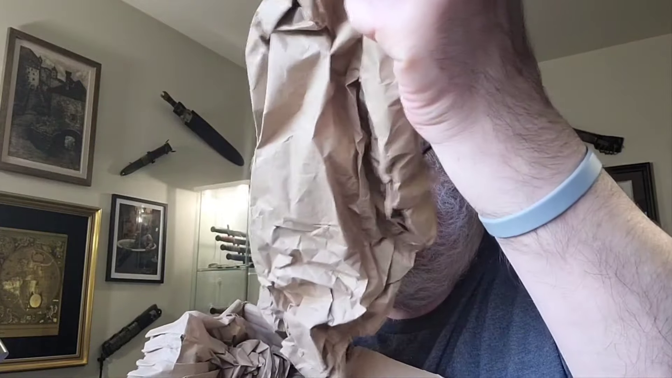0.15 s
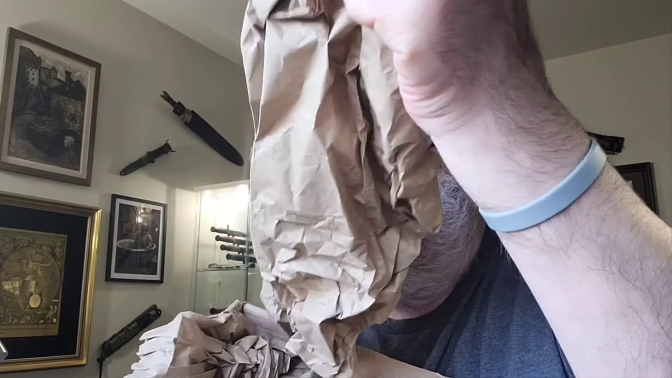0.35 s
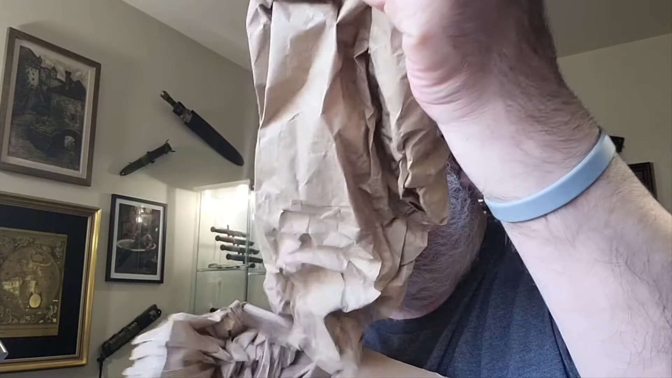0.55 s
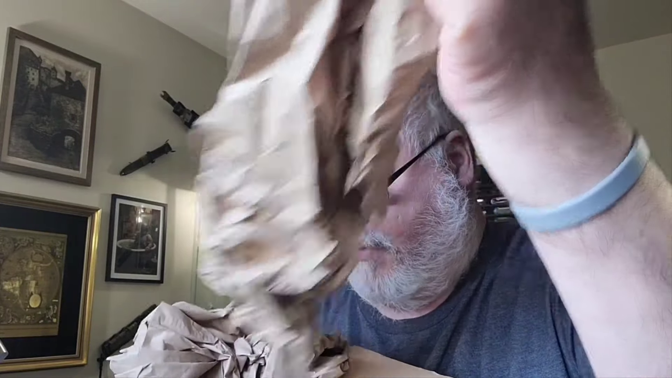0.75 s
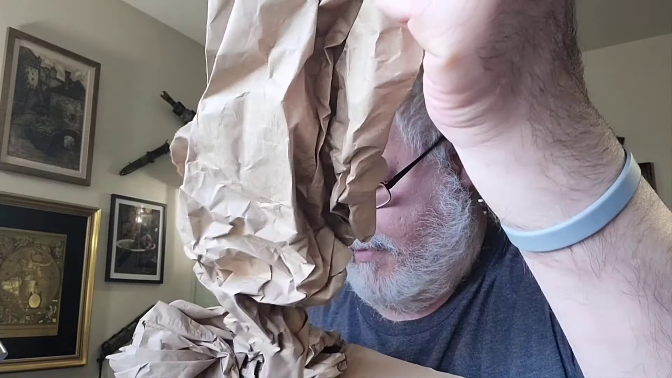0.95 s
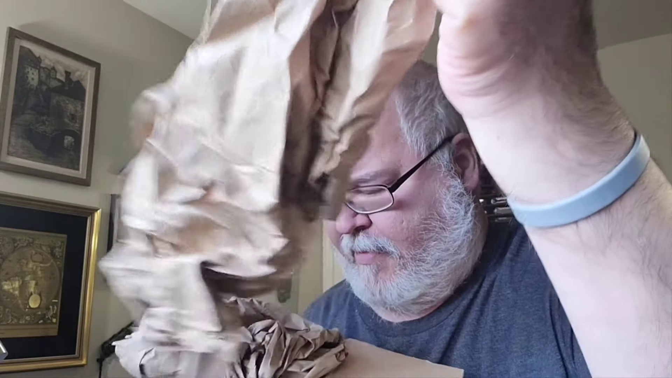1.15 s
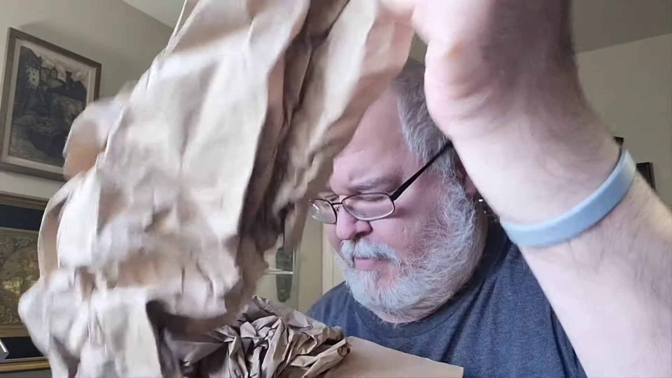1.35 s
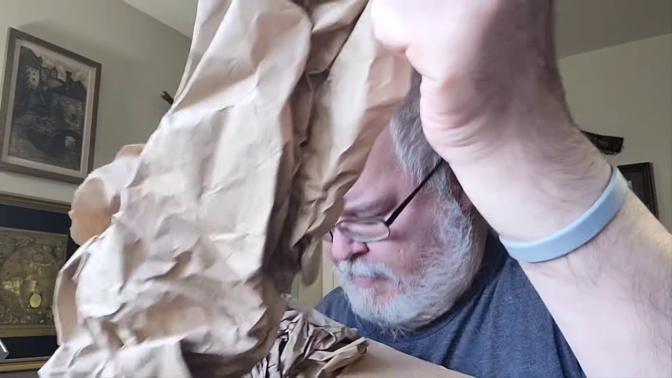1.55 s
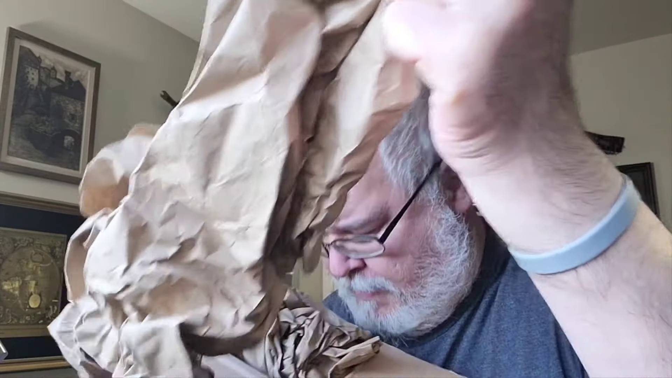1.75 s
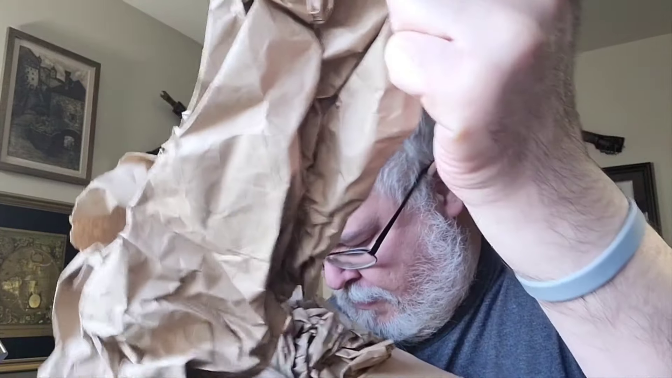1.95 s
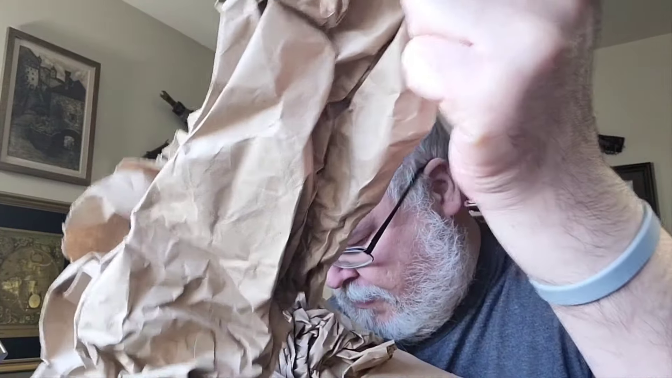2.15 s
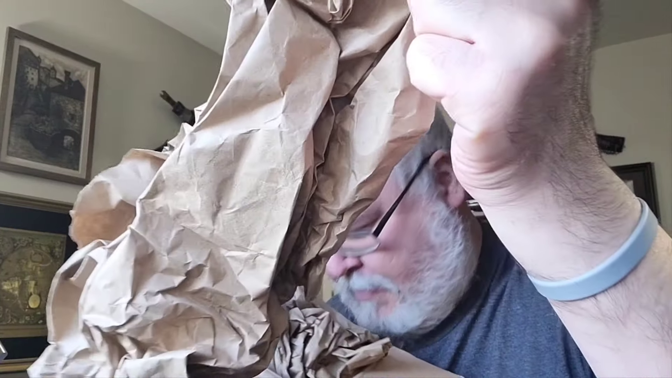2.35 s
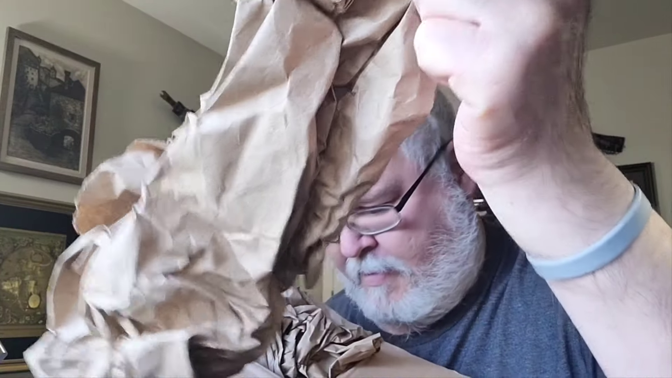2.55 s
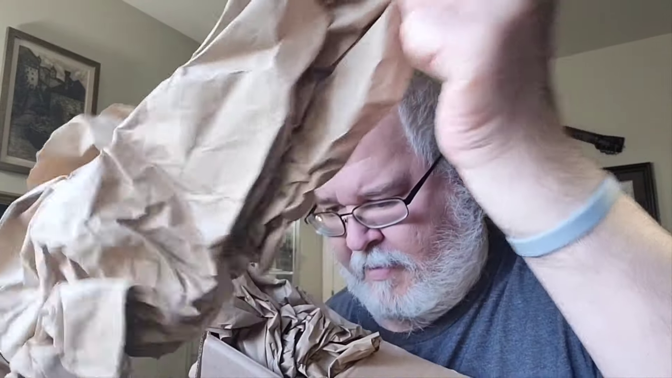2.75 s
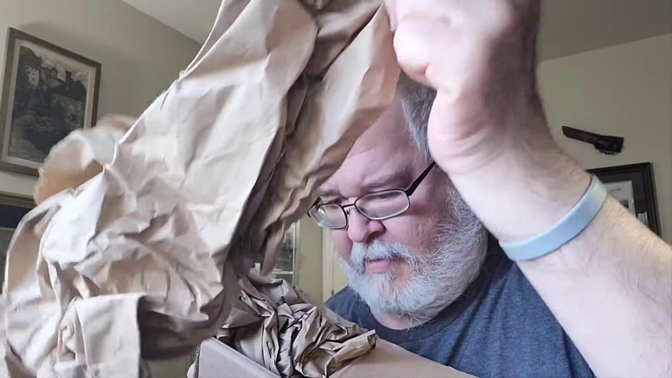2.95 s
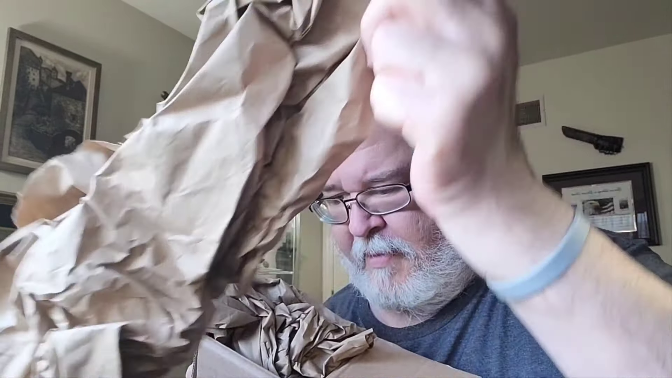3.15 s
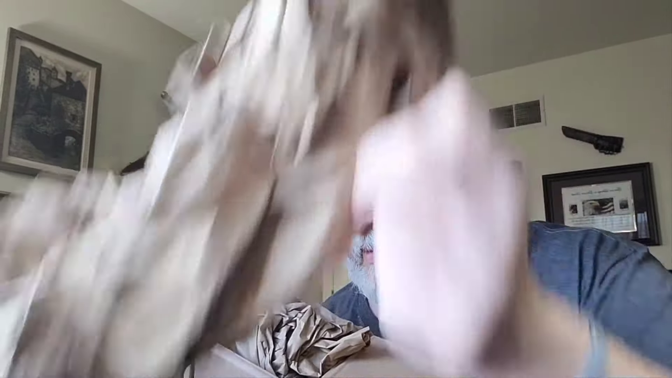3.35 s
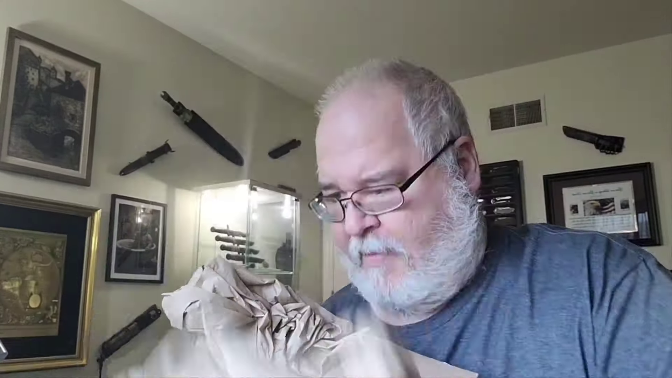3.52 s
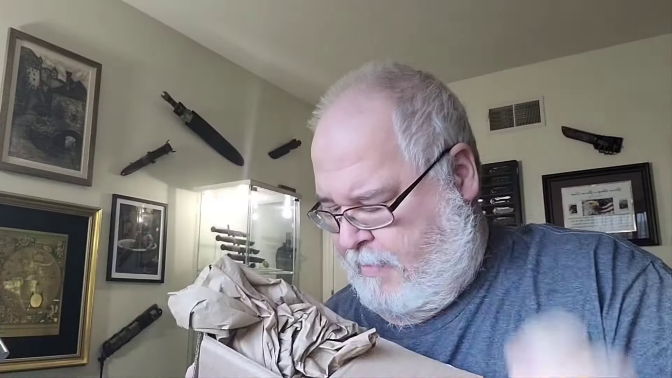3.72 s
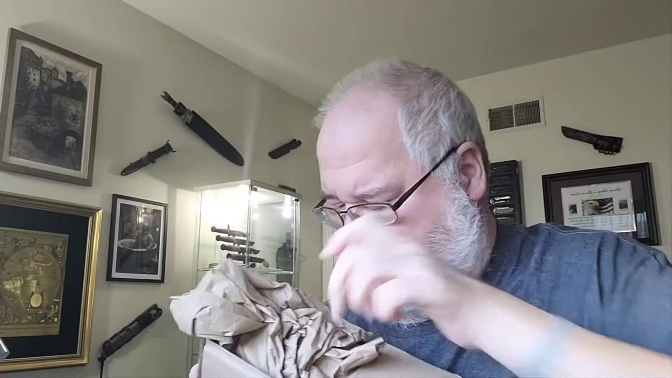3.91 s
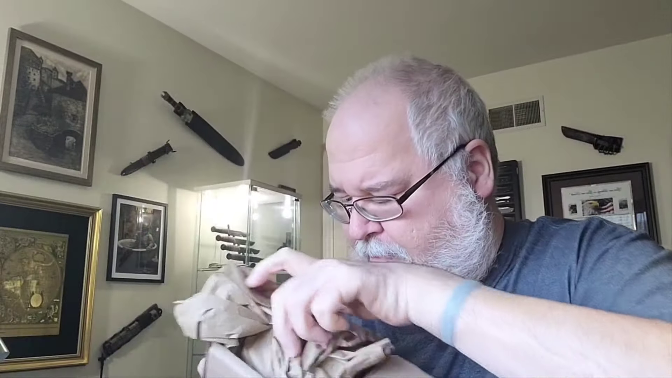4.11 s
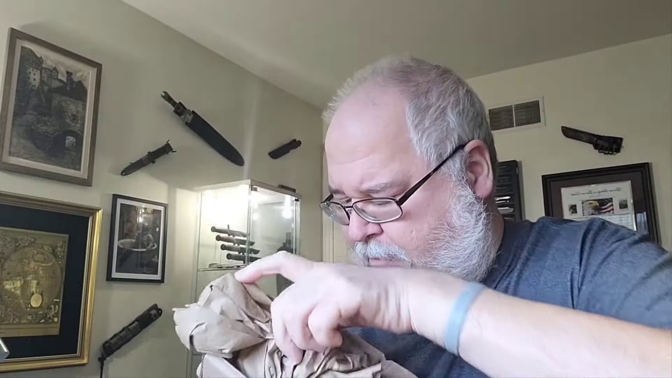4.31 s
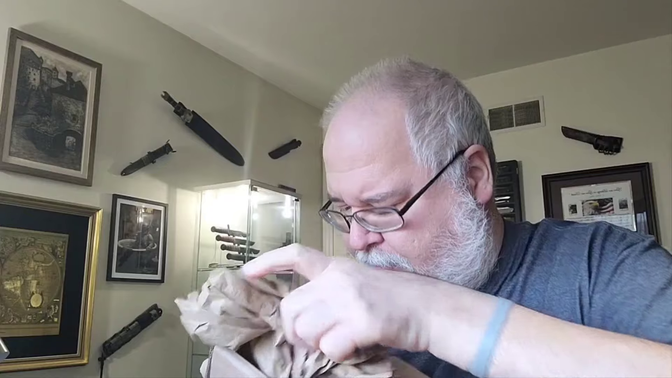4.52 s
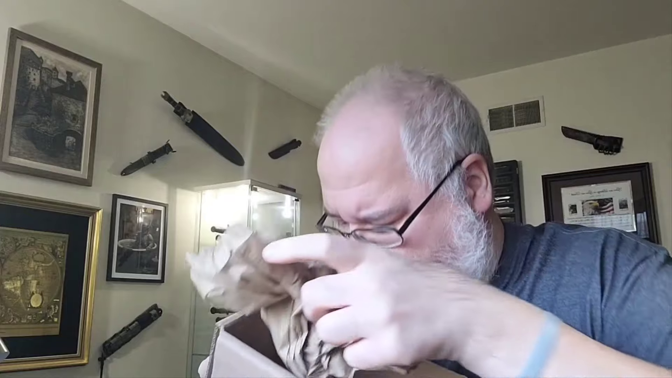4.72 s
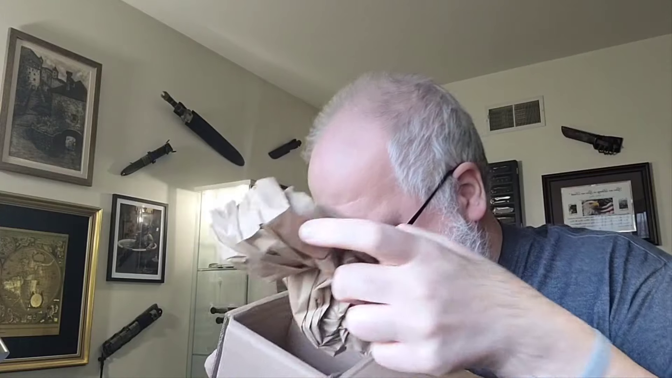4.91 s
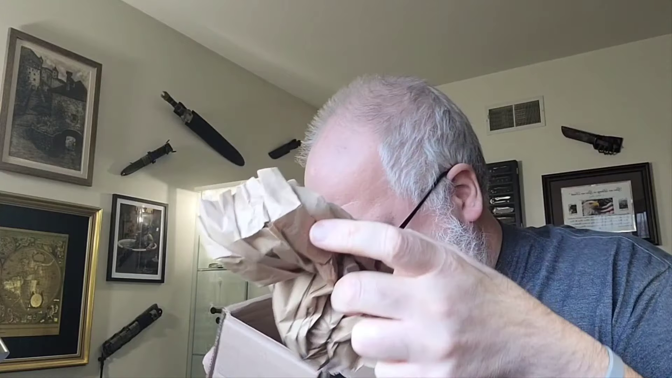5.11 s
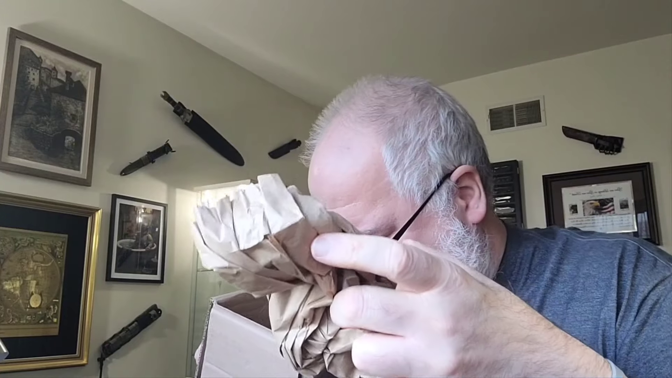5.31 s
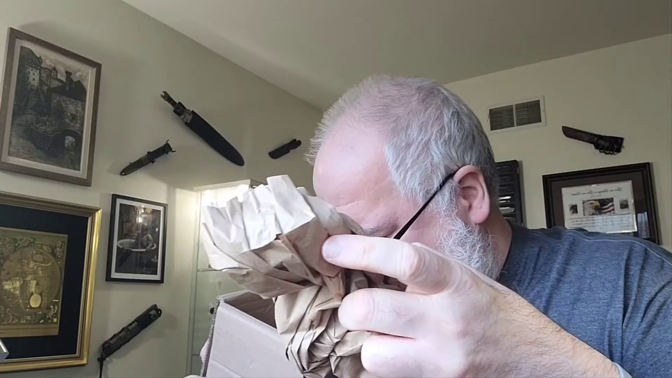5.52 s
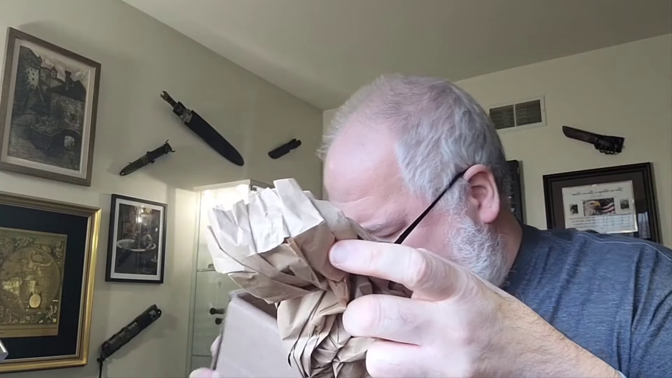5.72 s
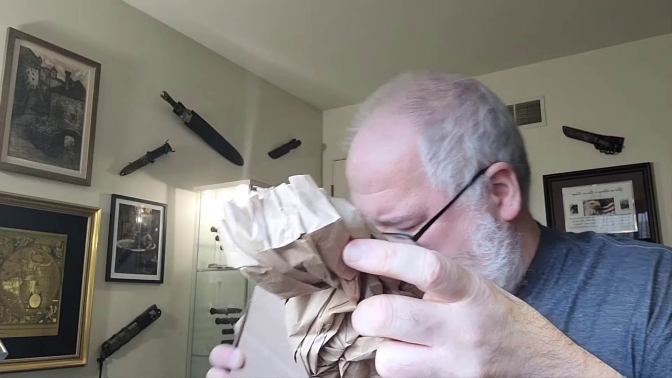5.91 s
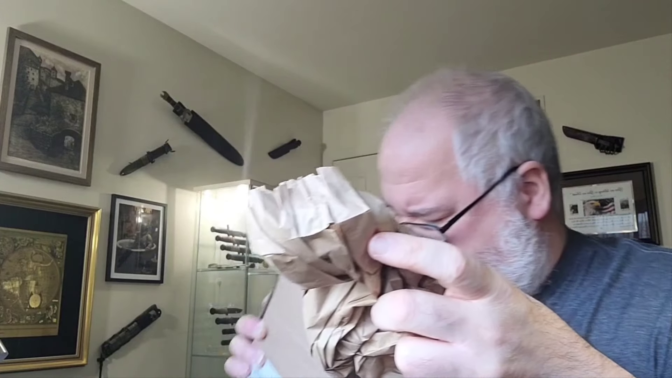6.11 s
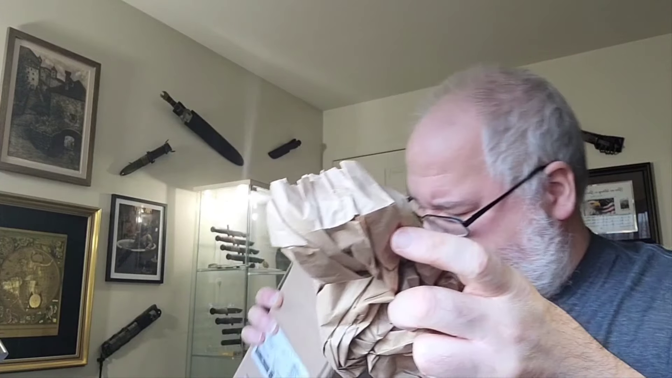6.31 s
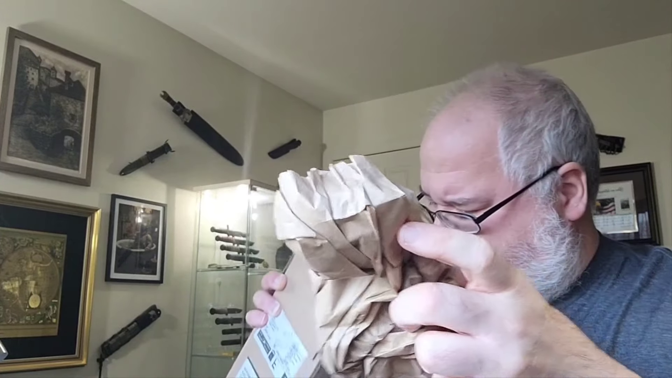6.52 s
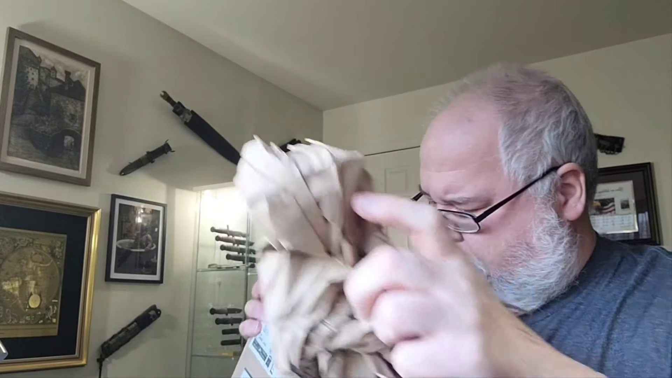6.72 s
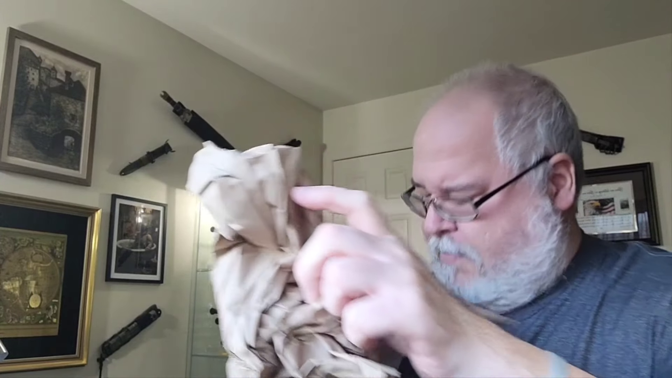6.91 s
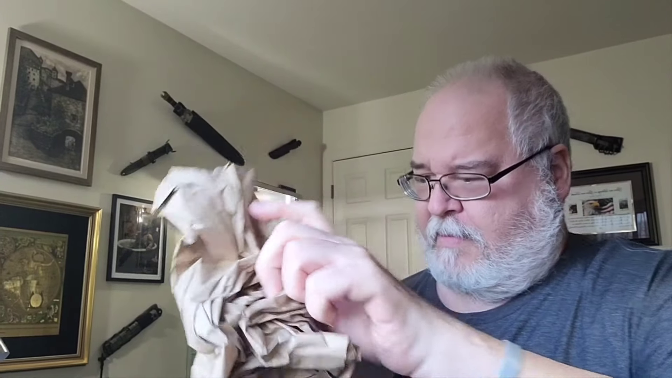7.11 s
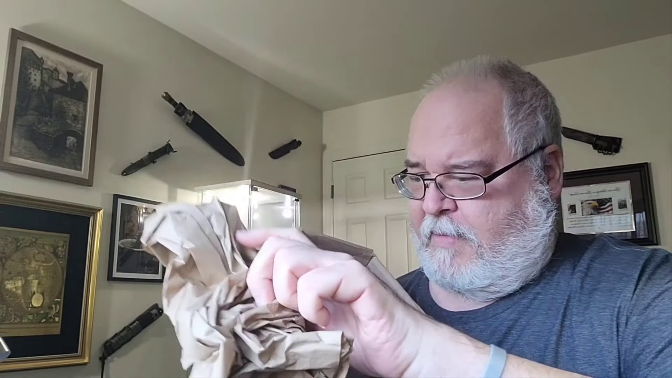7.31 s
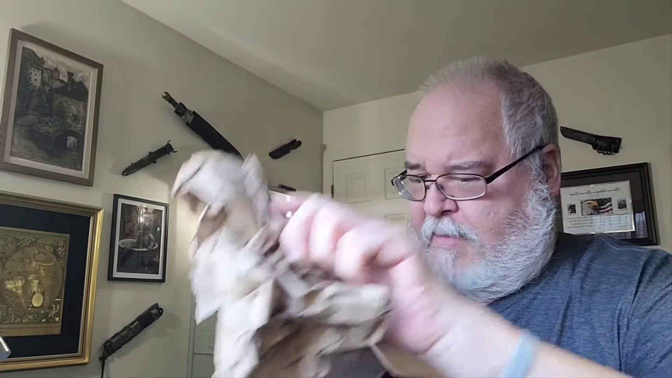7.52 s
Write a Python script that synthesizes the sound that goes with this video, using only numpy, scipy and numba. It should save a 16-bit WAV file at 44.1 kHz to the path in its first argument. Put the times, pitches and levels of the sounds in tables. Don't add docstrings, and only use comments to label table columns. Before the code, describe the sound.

In a small furnished room with a faint low hum, stiff packing paper is handled close to a stereo microphone. From 0 to 0.5 s a sheet is lifted in jerks, dense crinkles and bright snaps clustering around 0.1-0.3. After a short lull the loudest crack bursts at 0.7, with dull knocks of the cardboard box, then crackling continues, with a snap at 1.0, thinning by 1.5. From 1.5 to 3.4 the sheet dangles: sparse ticks, soft creases and light rustles, slightly busier near 2.8 and 3.0. At 3.5-3.85 it is dropped with a quick crisp crunch and a second rustle. A second sheet is grabbed and pulled from 4.15 to 4.85, a thick run of crunching, sharp snaps and low box thumps. From 5 s it is almost quiet, with isolated tiny clicks, near silence around 6, then faint crinkles from 6.8 to the end at about 7.6. Echoes are short and dull.

```python
import sys
import numpy as np
from scipy import signal
from scipy.fft import rfft, irfft
from scipy.io import wavfile
from scipy.ndimage import uniform_filter1d
from numba import njit

SR = 44100
rng = np.random.default_rng(int(sys.argv[2]) if len(sys.argv) > 2 else 0)


def master_out(mix):
    frames = np.transpose(np.atleast_2d(mix))
    ceiling = np.clip(frames, -1, 1)
    pcm = np.round(ceiling * 32767).astype(np.int16)
    wavfile.write(sys.argv[1], SR, pcm)


def magnitude_from_level(level_db):
    exponent = np.asarray(level_db, float) / 20
    return 10 ** exponent


N = 333396
DURATION_S = N / SR

# pitch_hz, level_db (per Hz)
PAPER_TONE = [(24, -41.5), (40, -11.5), (85, -1), (127, -5.5), (163, -3), (269, -9), (402, -4.5),
              (873, -10.5), (1410, -4), (2320, -8), (3060, -8.5), (3650, -9), (5310, -13.5), (8550, -11),
              (16000, -15.5)]
RIGHT_LAG, LAG_SPREAD = 3.98, 2.83


def colour(x, points):
    hz, db = np.transpose(points)
    grid_hz = np.maximum(np.fft.rfftfreq(4096, 1 / SR), 1)
    log_gain = np.interp(np.log(grid_hz), np.log(hz), db) * np.log(10) / 20
    cepstrum = irfft(log_gain)
    cepstrum[1:2048] *= 2
    cepstrum[2049:] = 0
    response = irfft(np.exp(rfft(cepstrum)))
    return signal.fftconvolve(x, response[None], axes=1)[:, :N]


def highpass(x, hz, order):
    return signal.sosfilt(signal.butter(order, hz, "high", fs=SR, output="sos"), x)


def resonance(x, hz, width_hz):
    return signal.lfilter(*signal.iirpeak(hz, hz / width_hz, fs=SR), x)


def unit(x):
    return x / np.sqrt(np.mean(x ** 2))


def walk(rate, count):
    hold = int(SR / rate)
    steps = rng.standard_normal((count, N // hold + 1))
    return uniform_filter1d(np.repeat(steps, hold, axis=1), hold, axis=1)[:, :N]


@njit
def rings(start, hz, t60, size, rise, count, sr):
    out = np.zeros(count)
    for k in range(len(start)):
        rate = 2j * np.pi * hz[k] / sr - np.log(1000) / (t60[k] * sr)
        first = int(np.ceil(start[k]))
        last = min(first + int(.8 * t60[k] * sr) + 2, count)
        z = size[k] * np.exp(rate * (first - start[k]))
        turn = np.exp(rate)
        swell = 1.
        for i in range(max(first, 0), last):
            swell *= np.exp(-1 / rise[k])
            out[i] += z.imag * (1 - swell)
            z *= turn
    return out


def ports(s, hz, t60, db, lag, pan_db, rise):
    hz = np.clip(hz, 30, .45 * SR)
    one = np.ones_like(s)
    pair = ((0, pan_db / 2), (lag, -pan_db / 2))
    return np.array([rings(s * SR + delay, hz, t60 * one, magnitude_from_level(db + gain_db), rise * one, N, 1. * SR)
                     for delay, gain_db in pair])


def swarm(s, size_db, lag, pan_db, pitch, lo_hz, hi_hz, cycles):
    hz = lo_hz * (hi_hz / lo_hz) ** pitch
    level_db = size_db + 20 * np.log10(hz / 5000)
    return colour(ports(s, hz, cycles / hz, level_db, lag, pan_db, SR / hz), PAPER_TONE)


def hum():
    # pitch_hz, level_db (per Hz)
    hum_tone = [(18, -38), (30, -14.5), (79, -16), (105, -5), (150, -6.5), (200, -15), (280, -18.5),
                (500, -22.5), (950, -37.0), (1350, -32.0), (1850, -52), (2500, -55.0), (5600, -45.5),
                (6900, -46.5), (7500, -55.0), (16000, -54.5)][1:]
    mid, side = rng.standard_normal((2, N))
    side = highpass(side, 300, 1) + 0.13 * side
    noise = unit(colour(np.array([mid + side, mid - side]), hum_tone))
    return noise * magnitude_from_level(-66 + 1.3 * walk(7, count=1))


def handling():
    # peak_s, crinkle_db, rise_s, fall_s, slack_db (panels re crinkle)
    lift = [(0.0, -44.5, .05, 0.071, 1.5), (.13, -40, 0.049, 0.3, -0.5), (.175, -33.5, 0.031, 0.053, -3),
            (.24, -32.5, 0.058, 0.024, -0.5), (.285, -39.5, 0.023, 0.019, -3.5),
            (.46, -41.5, 0.18, 0.19, 1.5), (.585, -51, 0.13, 0.064, 2.5), (.675, -38, 0.017, .02, 1.5),
            (.684, -23.5, 0.0065, 0.072, -7), (.705, -31.5, 0.038, 0.13, -4.5),
            (.738, -35.5, 0.064, 0.055, 8), (.865, -41, 0.084, 0.11, -4), (.93, -54.5, 0.025, 0.079, 7),
            (1.005, -49, 0.076, 0.064, 1), (1.118, -43, 0.053, 0.07, -7), (1.2, -58.5, 0.19, 0.073, 1.5),
            (1.315, -51, 0.092, 0.085, 2.5), (1.445, -57.5, 0.27, .2, -3), (1.54, -57, 0.27, 0.081, 6)]
    dangle = [(1.698, -60.5, 0.066, 0.22, 4), (1.778, -53, 0.023, 0.089, 0.5), (2.01, -60, 0.16, 0.027, 0),
              (1.86, -77, .15, 0.095, -5), (2.15, -67, 0.52, 0.37, 5), (2.354, -66, 0.024, 0.023, 10.5),
              (2.528, -65.5, 0.11, 0.22, 1.5), (2.811, -50.5, 0.11, 0.2, -0.7), (2.92, -65, 0.18, 0.33, 5),
              (3.033, -45.5, 0.014, 0.024, -0.5), (3.122, -52, 0.016, 0.021, -2.5),
              (3.202, -66, 0.098, 0.34, -1), (3.35, -61.5, 0.085, 0.47, 3.5),
              (3.482, -48.5, 0.068, 0.051, 0.5), (3.55, -55, 0.088, .05, 1), (3.57, -37, .008, 0.061, -16),
              (3.586, -32.5, 0.026, 0.12, -3.5), (3.66, -47.5, 0.11, .1, 4),
              (3.727, -37, 0.063, 0.089, -7.5), (3.771, -34.5, 0.01, 0.022, -8.5),
              (3.788, -42.5, 0.062, 0.021, 0), (3.84, -54, 0.32, 0.13, 1.5), (3.95, -63, .2, .15, 0.5)]
    grab = [(4.046, -65, 0.015, .3, 7), (4.15, -60, 0.19, .1, -2), (4.173, -38.5, 0.0094, 0.079, -12),
            (4.211, -39.5, 0.058, 0.051, 0), (4.29, -35, 0.027, 0.044, -15), (4.335, -34, 0.1, 0.062, -1.5),
            (4.425, -36, 0.07, 0.17, -1.5), (4.54, -43.5, 0.037, 0.33, -1.5),
            (4.615, -37.5, 0.026, 0.1, -3.5), (4.749, -43, 0.16, 0.083, -6.5),
            (4.835, -49, 0.037, 0.076, -1.5), (4.93, -71.5, 0.15, 0.11, 16)]
    turn = [ (5.04, -74, 0.11, 0.11, 5), (5.138, -64, 0.03, 0.22, -2), (5.25, -67.5, 0.07, 0.52, 7.5),
            (5.3, -74, 0.17, 0.35, -1), (5.405, -66.5, 0.28, 0.027, -4), (5.49, -85.5, 0.036, 0.057, -1),
            (5.678, -70, 0.029, .08, 1), (5.77, -81, 0.059, 0.054, 13), (6.53, -77.5, .15, .15, -1),
            (6.641, -71, 0.12, 0.13, -1), (6.8, -61, 0.15, 0.11, -2), (6.969, -65, 0.039, 0.095, 0),
            (7.128, -64.5, 0.051, 0.051, 1.5), (7.244, -72.5, 0.073, 0.072, 1.5),
            (7.307, -62.5, 0.014, 0.092, -2.5), (7.43, -60.5, 0.092, 0.16, -2.5), (7.5, -66, .08, 0.17, -2)]
    swing_db = 20
    rounding = 1.35
    rest_db, rest_slack_db = -87.5, 1.9

    s, db, rise_s, fall_s, slack_db = np.concatenate([lift, dangle, grab, turn]).T[..., None]
    t = np.arange(0, DURATION_S, .001)
    from_peak = np.where(t < s, (s - t) / rise_s, (t - s) / fall_s)
    power = magnitude_from_level(db - swing_db * from_peak ** rounding) ** 2
    rest = magnitude_from_level(rest_db) ** 2
    total = power.sum(axis=0) + rest
    slack = ((power * slack_db).sum(axis=0) + rest * rest_slack_db) / total
    sample_s = np.arange(N) / SR
    return np.interp(sample_s, t, 10 * np.log10(total)), np.interp(sample_s, t, slack)


def crinkle(crinkle_db, panel_db, fine_db, count=30000, folds=7):
    # start_s, pitch_hz
    panel_path = [(0.0, 1465), (1.22, 1470), (1.5, 2100), (1.75, 1040), (2.07, 1090), (2.21, 1490),
                  (2.45, 1086), (2.6, 1960), (2.76, 1960), (3.0, 1245), (3.77, 1810), (4.08, 1356),
                  (4.72, 1580), (4.9, 2120), (4.98, 1400), (5.22, 1340), (5.28, 2950), (5.39, 2900),
                  (5.45, 1450), (6.5, 1274), (7.1, 1447), (7.4, 1330)]
    # start_s, pitch_hz
    facet_path = [(0.0, 4880), (.7, 5100), (.9, 5350), (2.9, 5270), (3.58, 5860), (3.8, 5420), (4.7, 5220),
                  (6.55, 3720), (6.85, 4470), (7.05, 5400), (7.45, 5580)]
    fine_evenness = 0.7

    s = np.sort(rng.random(count)) * DURATION_S
    size_luck, *free_pitch, fold_luck, held_luck = rng.random((count, 6)).T
    lag_odd, pan_odd, *own_odd = rng.standard_normal((count, 5)).T
    facet_odd, panel_odd = own_odd[1:]

    grip = (s / .13).astype(int)
    fold_pitch = rng.random((200, folds, 3))[grip, (fold_luck * folds).astype(int)].T
    panel_hz = np.interp(s, *np.transpose(panel_path)) * (1 + .09 * panel_odd)
    panel_pitch = np.log(panel_hz / 720) / np.log(3000 / 720)
    fold_pitch[0] = np.where(fold_luck < .6, panel_pitch, fold_pitch[0])
    facet_hz = np.interp(s, *np.transpose(facet_path)) * (1 + 0.061 * facet_odd)
    facet_pitch = np.log(facet_hz / 2876) / np.log(7300 / 2876)
    fold_pitch[1] = np.where(fold_luck < .4, facet_pitch, fold_pitch[1])

    size_db = -2.3 * np.log(1 - size_luck) + 3.0 * walk(60, count=1)[0, (s * SR).astype(int)]
    lag, pan_db = RIGHT_LAG + LAG_SPREAD * lag_odd, 1.8 + 4.6 * pan_odd
    # low Hz, high Hz, cycles to fade 60 dB, own scatter dB, share on held folds, level dB
    parts = ((724.0, 3176, 28.0, 2.0, 0.5, crinkle_db + panel_db + 0.053),
             (2789, 7330, 62.0, 0.99, 0.5, crinkle_db - 3.0),
             (7300, 16500, 60.0, 1.5, 0.08, crinkle_db + fine_db + 2.5))
    out = 0
    for k, (lo_hz, hi_hz, cycles, own_db, held, db) in enumerate(parts):
        pitch = np.where(held_luck < held, fold_pitch[k], free_pitch[k])
        evenness = fine_evenness if k == 2 else 0
        grain_db = size_db * (1 - evenness) + own_db * own_odd[k]
        layer = swarm(s, grain_db, lag, pan_db, pitch, lo_hz, hi_hz, cycles)
        power = uniform_filter1d(np.mean(layer ** 2, axis=0), size=1800)
        out = out + layer / np.sqrt(power + 1e-12) * magnitude_from_level(db)
    return out


def snaps(count=9):
    # start_s, facet_peak_db, pitch_hz, panel_db (re facet)
    facet_snaps = [(0.1198, -21, 4800, -17), (0.1671, -15, 5340, -10), (0.2408, -26.5, 5030, 5),
                   (0.6801, -17, 4500, -17), (0.6968, -11, 4780, -30), (.6965, -15, 6650, -26),
                   (3.869, -33, 3070, -10), (3.4665, -43, 5600, 4), (7.31, -55.5, 5360, -5),
                   (1.321, -31.5, 4850, -19), (2.128, -51.5, 5290, -4.5), (2.8341, -36, 5080, -6),
                   (3.0295, -46, 2920, -5), (3.1214, -67, 3280, 5), (3.4676, -35, 3660, -4),
                   (3.77, -31, 5360, -19), (3.8694, -37.5, 5900, -27), (3.9361, -42.5, 6680, -17),
                   (4.1377, -49.5, 5240, -8), (4.2, -26.5, 5260, -14), (4.2926, -20, 5180, -15),
                   (4.3361, -22, 4300, -14), (4.4262, -22.5, 5000, -3.5), (4.459, -30, 5240, -1),
                   (4.4933, -25, 4840, -8), (4.6086, -16.5, 4780, -10), (4.6197, -22, 3100, -4),
                   (4.661, -34.5, 5450, -14), (5.393, -46.5, 5610, -18), (5.4793, -42.5, 5740, -4.5),
                   (6.0007, -57, 5540, -7), (6.8202, -49, 3890, 1.5), (7.0492, -52, 5550, -9.5),
                   (7.4832, -43, 4980, -4.5)]
    # start_s, facet_peak_db, pitch_hz, panel_db (re facet)
    panel_snaps = [(0.0365, -41, 1630, 6.5), (1.0028, -24, 2620, -2.5), (1.233, -47, 1800, -3),
                   (1.289, -35.5, 1080, -3.5), (1.3078, -46, 1670, 4), (1.4248, -40.5, 2730, -2.5),
                   (1.4367, -37.5, 2040, -1.5), (1.685, -44.5, 2940, 5.5), (1.712, -43.5, 1800, -1.5),
                   (1.7745, -40.5, 970, 5.5), (1.9914, -48.5, 1050, 6), (2.0126, -41.5, 1020, -1),
                   (2.202, -52.5, 1670, 1), (2.2435, -41, 1880, -5), (2.645, -66.5, 1080, 15),
                   (2.739, -45.5, 2035, 14), (2.8012, -36, 980, -3), (2.872, -45, 1650, -0.5),
                   (3.3139, -43, 2730, 0.5), (3.661, -44, 2640, 8), (4.0427, -39, 1400, -8.5),
                   (4.4, -31, 1400, 0.5), (5.1382, -50, 1390, -5), (5.171, -47, 1364, 1.5),
                   (5.6701, -53, 1420, -2.5), (5.7632, -44, 1304, -11.5), (6.1396, -63.5, 1360, 6.5),
                   (7.119, -54.5, 1570, 10), (7.3115, -49, 1656, -2), (7.367, -50, 1330, 1.5)]
    # start_s, peak_db, pitch_hz
    small_snaps = [(0.0767, -42, 1460), (0.1092, -35, 4660), (0.2284, -20, 1510), (0.283, -30, 1720),
                   (0.376, -33, 1470), (0.6694, -33, 4210), (0.8315, -33, 5400), (0.8746, -23, 5350),
                   (0.9905, -31.5, 5270), (1.0884, -37, 1700), (1.1003, -39, 5600), (1.1892, -45, 1080),
                   (1.269, -41, 2000), (1.39, -44, 5930), (1.4656, -44, 2110), (1.508, -50, 1640),
                   (1.5349, -44, 2130), (2.171, -61, 2110), (2.357, -48.5, 1550), (2.783, -48, 1080),
                   (2.905, -39.5, 1100), (2.949, -45, 5350), (3.1812, -48, 5250), (3.3368, -53, 1160),
                   (3.3662, -61, 2120), (3.3912, -48.5, 1740), (3.4535, -45, 3640), (3.57, -28, 5670),
                   (3.5784, -32, 6500), (3.5837, -20, 6160), (3.71, -44, 5380), (3.7274, -40, 5200),
                   (4.175, -29, 3970), (4.184, -27, 5400), (4.2738, -26.5, 5100), (4.378, -27, 4970),
                   (4.5255, -25.5, 5480), (4.752, -34, 4800), (4.8294, -43, 1400), (5.236, -60.5, 1268),
                   (6.968, -50, 4500), (7.1013, -53.5, 1560), (7.3438, -50.5, 1264), (7.4203, -46, 1290)]
    small_db, small_panel_db = -3.5, -5

    small = np.insert(small_snaps, 3, small_panel_db, axis=1) + [0, small_db, 0, 0]
    s, db, hz, panel_db = np.concatenate([facet_snaps, panel_snaps, small]).T
    edge_db = -1 + 0.046 * panel_db
    luck = rng.random((len(s), count, 6))
    lag = RIGHT_LAG + LAG_SPREAD * (luck[:, 0, 5] - .5)
    low = hz < 3000
    panel_hz = np.where(low, hz, 1200 + 500 * luck[:, 1, 5])
    facet_hz = np.where(low, 4000 + 2800 * luck[:, 1, 5], hz)
    out = ports(s, panel_hz, np.where(low, .016, .011), db + panel_db + 5.5, lag, 1.3, 25.0)
    out += ports(s, facet_hz, 0.009, db + np.where(low, -2.5, 3.0), lag, 1.9, 12.0)

    start_luck, mid_luck, top_luck, late_luck, shower_pitch = luck[..., :5].reshape(-1, 5).T
    lags, level_db = np.repeat(lag, count), np.repeat(db, count)
    top_db = level_db + np.repeat(edge_db, count) - 16.0
    low_db = level_db + np.repeat(np.minimum(panel_db, 4.0), count) - 7.5
    start = np.repeat(s, count) + .0016 * start_luck ** 2
    out += ports(start, 3200 + 4100 * mid_luck, 0.0058, level_db - 5.5, lags, 1.9, 3.4)
    out += ports(start, 8300 + 7500 * top_luck, .005, top_db, lags, 1.1, 14.0)
    out += ports(start, 800 + 2200 * top_luck, 0.0037, low_db, lags, 0.8, 2.4)

    late_s = .002 - 0.0043 * np.log(1 - late_luck)
    shower_db = level_db - 7.5 - 350 * late_s
    return out + swarm(start + late_s, shower_db, lags, 1.1, shower_pitch, 1400, 9000, 34.0)


def ticks(count=14):
    # start_s, peak_db
    edge_ticks = [(0.1206, -29), (0.167, -39), (.2385, -27), (3.769, -60), (4.4262, -28), (7.049, -63),
                  (3.5783, -24), (3.594, -32), (0.2838, -45), (0.6963, -14.5), (0.7454, -40), (1.0016, -20),
                  (1.1682, -35), (1.29, -33), (1.3199, -28), (1.712, -62), (1.7744, -50), (2.2428, -46),
                  (2.7192, -44), (3.4654, -59), (3.7484, -50), (3.7884, -50), (3.9225, -59), (4.1719, -46),
                  (4.2931, -24.5), (4.3764, -39), (4.3999, -48), (4.4363, -46), (4.5246, -25),
                  (4.6084, -22), (4.6349, -37), (5.3941, -47.5), (5.4779, -52.5), (5.6684, -58),
                  (7.1177, -54), (7.4829, -66.5)]
    s, db = np.repeat(edge_ticks, count, axis=0).T
    pitch = (np.tile(np.arange(count), len(edge_ticks)) + rng.random(len(s))) / count
    return ports(s, 2500 + 13000 * pitch ** 1.2, 0.002, db - 5.0 - 8.0 * pitch, RIGHT_LAG, 1.1, 3.0)


def box(push_db, count=9000):
    # start_s, peak_db, pitch_hz
    knocks = [(0.164, -29, 120), (0.681, -21.5, 162), (.69, -26.5, 478), (0.741, -22.5, 195),
              (1.156, -39, 142), (2.15, -44, 293), (2.193, -47, 122), (2.202, -41.5, 260), (3.898, -51, 60),
              (2.709, -50, 186), (3.025, -61, 117), (3.459, -62, 285), (3.585, -37, 60), (3.6, -36, 40),
              (4.329, -32, 75), (.72, -34, 80), (0.601, -47, 330), (5.03, -53, 300), (3.722, -42, 440),
              (4.193, -38, 95), (4.314, -27, 166), (4.443, -28.5, 390), (4.61, -44.5, 389),
              (4.899, -43.5, 323), (4.934, -49, 150), (5.209, -47.5, 307), (5.33, -46, 336),
              (2.262, -50, 281)]
    s = np.sort(rng.random(count)) * DURATION_S
    pitch_luck, size_luck, lag_luck = rng.random((count, 3)).T
    hz = 45 * (1000 / 45) ** np.sqrt(pitch_luck)
    size_db = -1.2 * np.log(1 - size_luck) + 12.9 * np.log10(hz)
    lag = RIGHT_LAG + 30.0 * (lag_luck - .35)
    rub = colour(ports(s, hz, 5.34 / hz, size_db, lag, 1.5, .6 * SR / hz), PAPER_TONE)

    knock_s, knock_db, knock_hz = np.transpose(knocks)
    knocking = ports(knock_s, knock_hz, 0.051, knock_db, RIGHT_LAG + 9.0, 1.1, 60.0)
    return unit(rub) * magnitude_from_level(push_db - 0.9) + knocking


def housing(paper):
    # pitch_hz, width_hz, level_db
    case = [
        (1400, 500, -20.5),
        (4100, 440, -5.5),
        (4817, 1300, -5.5),
        (5350, 450, -1),
        (6330, 490, -10),
    ]
    for hz, width_hz, db in case:
        paper = paper + magnitude_from_level(db) * resonance(paper, hz, width_hz)
    return paper


def room(dry):
    t60_s, dull_hz, level_db = 0.085, 6840, -9
    t = np.arange(int(.5 * SR)) / SR
    mid, side = rng.standard_normal((2, len(t))) * magnitude_from_level(-60 * t / t60_s) * (t > .002)
    side = highpass(side, 500, 2)
    dull = signal.butter(1, dull_hz, fs=SR, output="sos")
    tail = signal.sosfilt(dull, np.array([mid + side, mid - side]))
    tail /= np.sqrt(np.sum(tail ** 2) / 2)
    return signal.fftconvolve(dry, tail, axes=1)[:, :N] * magnitude_from_level(level_db)


def shadow(heard):
    # pitch_hz, width_hz
    shadows = [
        [(880, 160), (9000, 1600)],
        [(7700, 700), (12300, 300)],
    ]
    heard = list(heard)
    for port, dips in enumerate(shadows):
        for hz, width_hz in dips:
            heard[port] = heard[port] - 0.67 * resonance(heard[port], hz, width_hz)
    return np.array(heard)


def scene():
    crinkle_db, panel_db = handling()
    effort_db = crinkle_db + 50
    push_db = -52 + 0.774 * effort_db + 0.66 * panel_db
    fine_db = -13.5 + 0.1263 * effort_db - 0.42 * panel_db
    cracks = highpass(snaps() + ticks(), 250, 2)
    paper = housing(crinkle(crinkle_db, panel_db, fine_db) + cracks) * magnitude_from_level(-3.5)
    return shadow(paper + room(paper) + box(push_db)) + hum()


def top_cut(x):
    return signal.sosfilt(signal.butter(12, 16830, fs=SR, output="sos"), x)


def record(dry):
    cut = signal.sosfilt(signal.ellip(8, .2, 60, 16000, fs=SR, output="sos"), dry)
    return top_cut(cut)


dry = scene()
out = record(dry)
master_out(out)
```